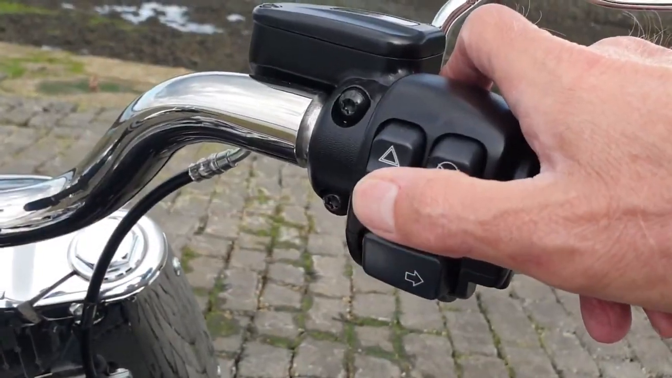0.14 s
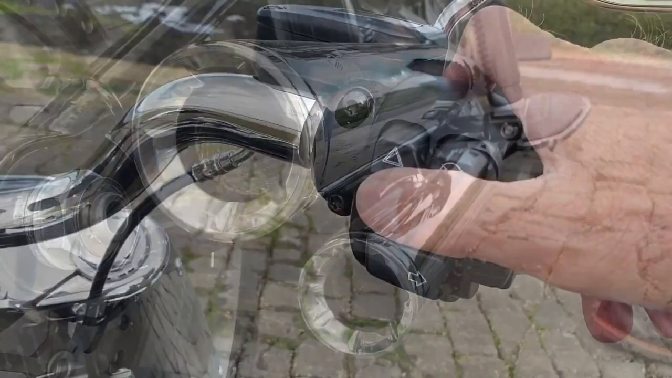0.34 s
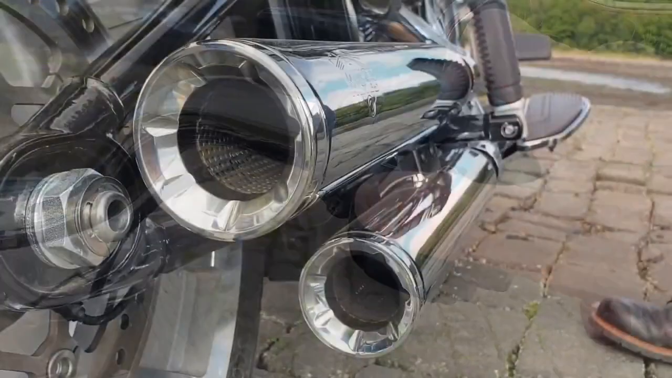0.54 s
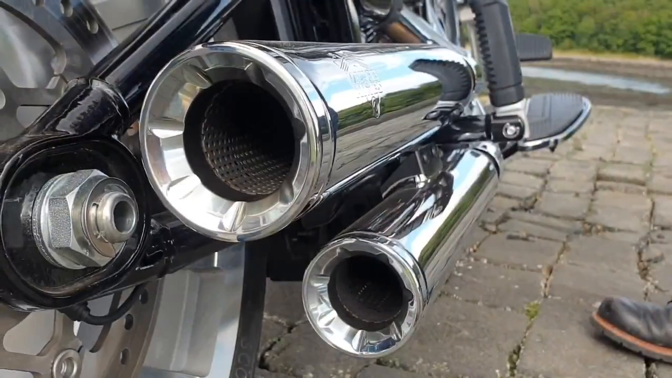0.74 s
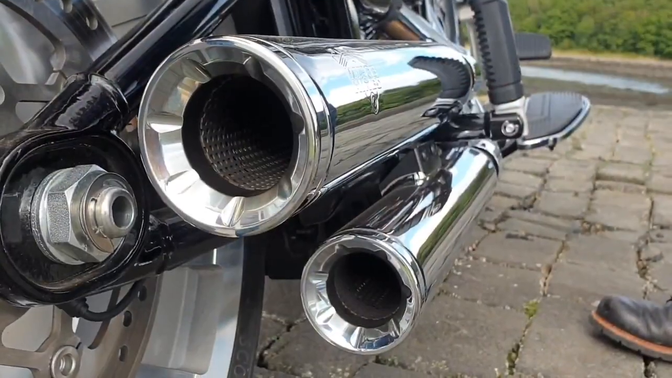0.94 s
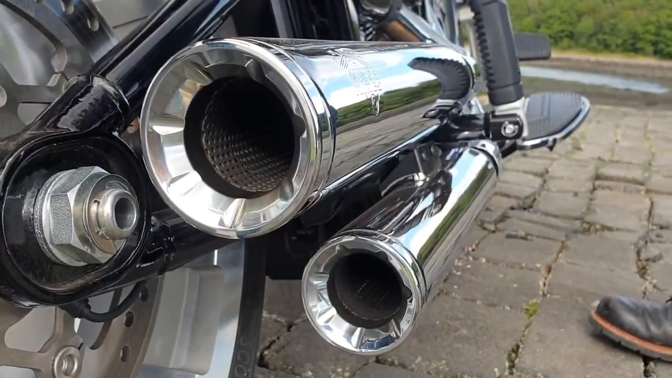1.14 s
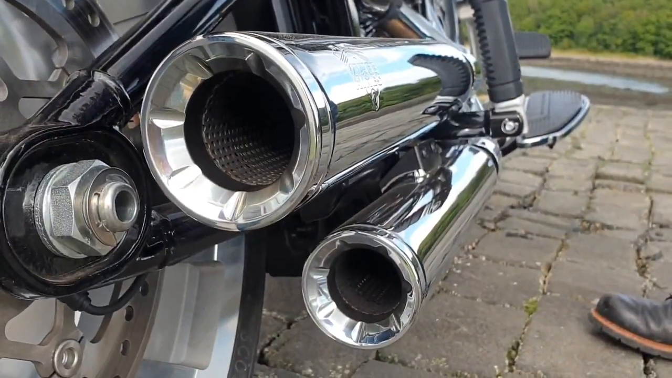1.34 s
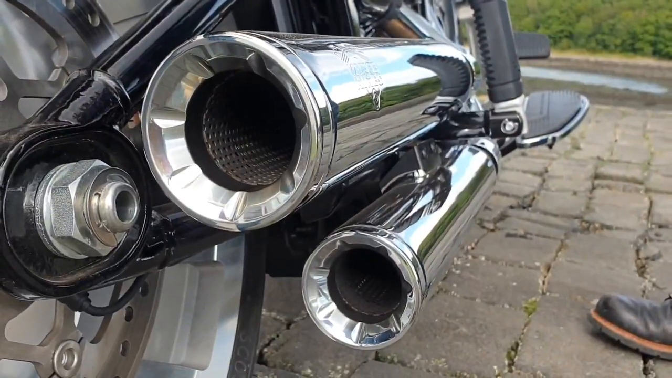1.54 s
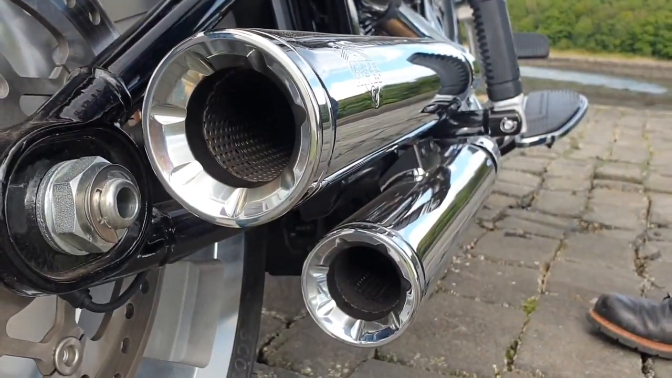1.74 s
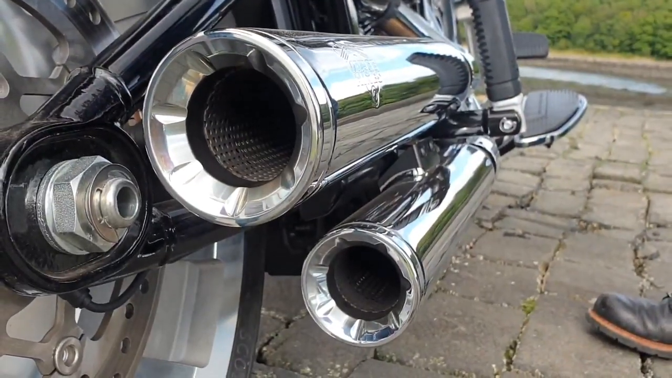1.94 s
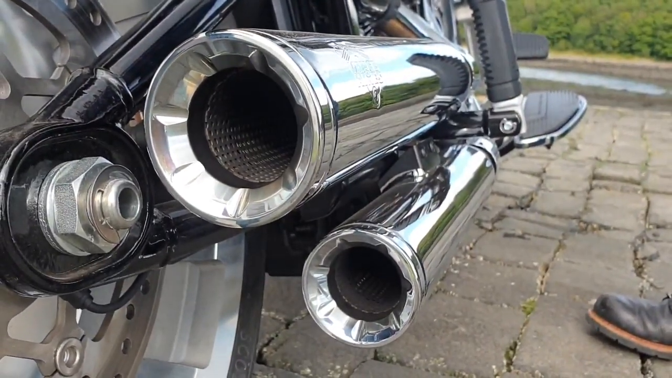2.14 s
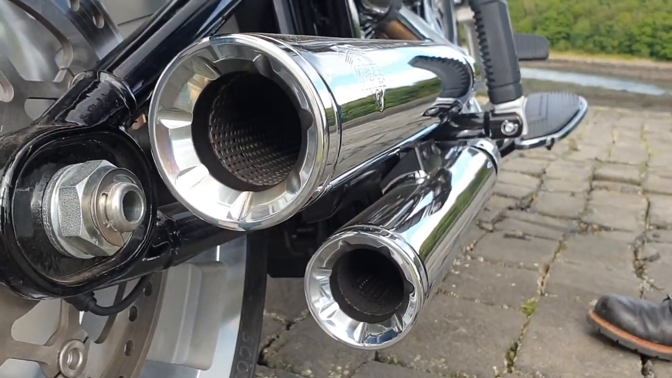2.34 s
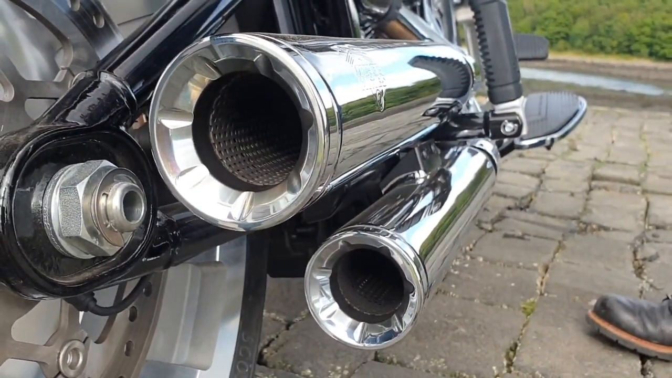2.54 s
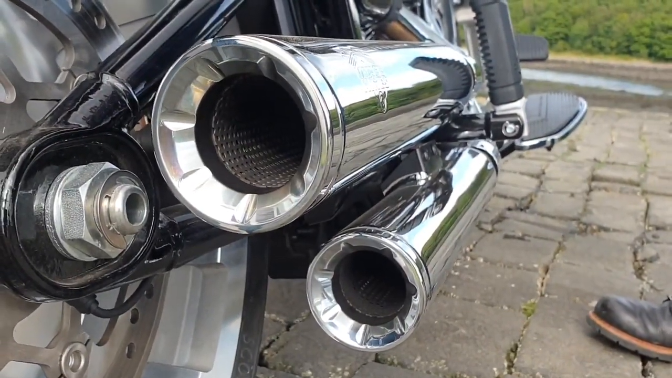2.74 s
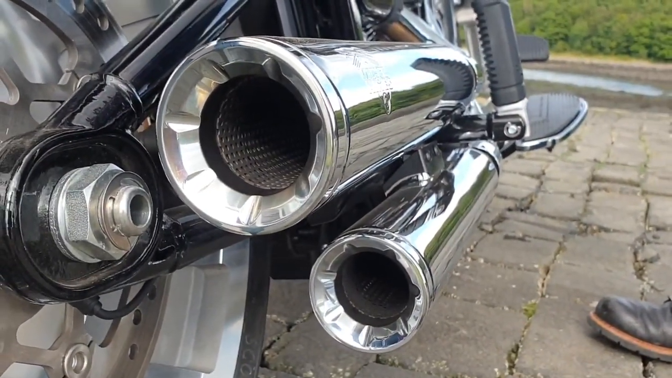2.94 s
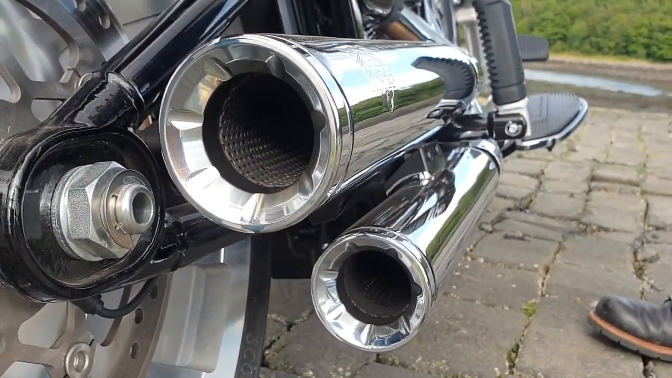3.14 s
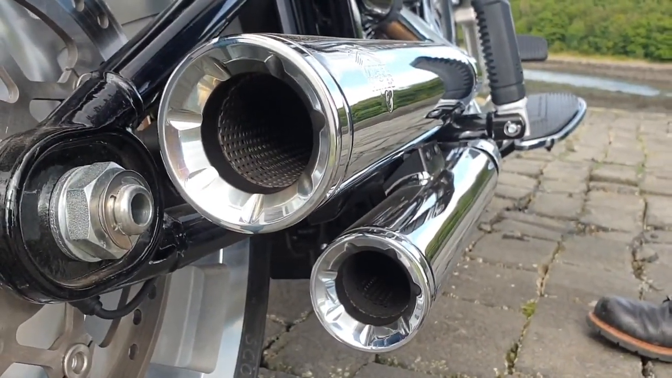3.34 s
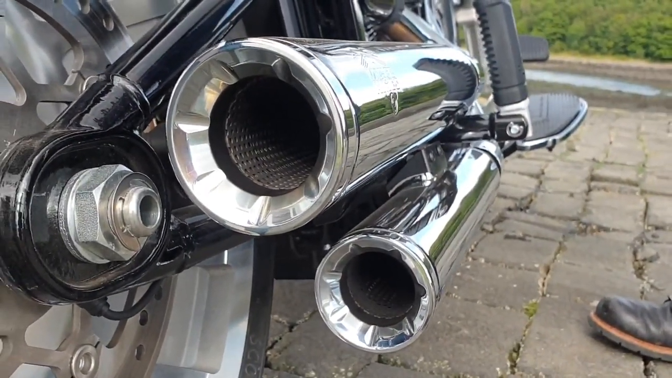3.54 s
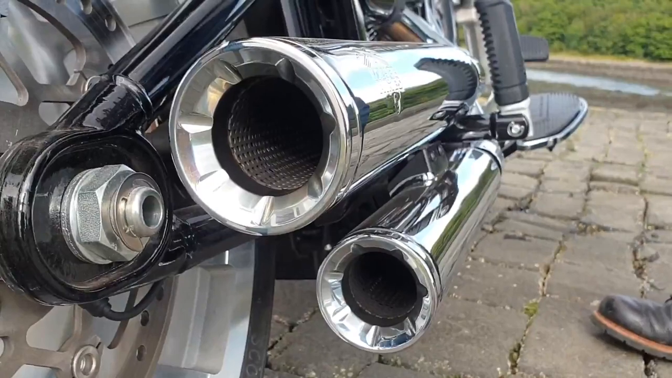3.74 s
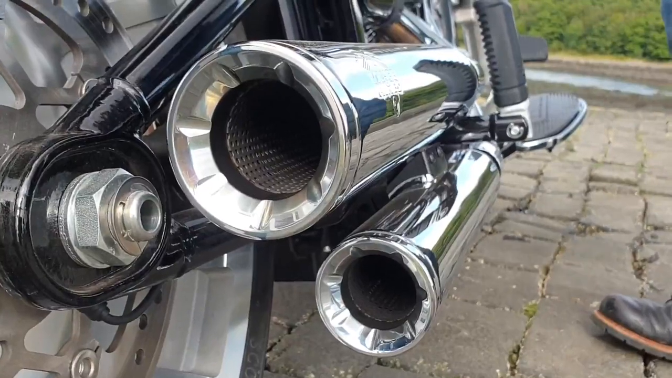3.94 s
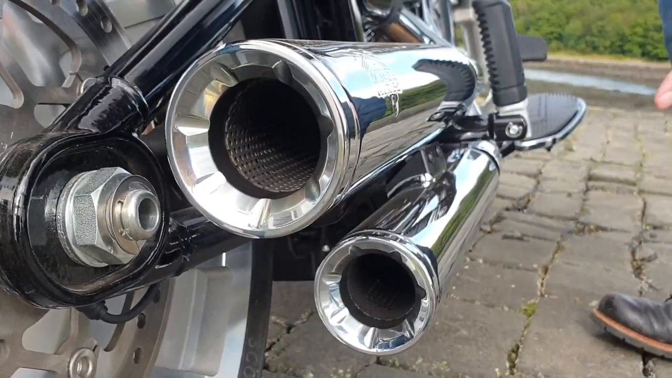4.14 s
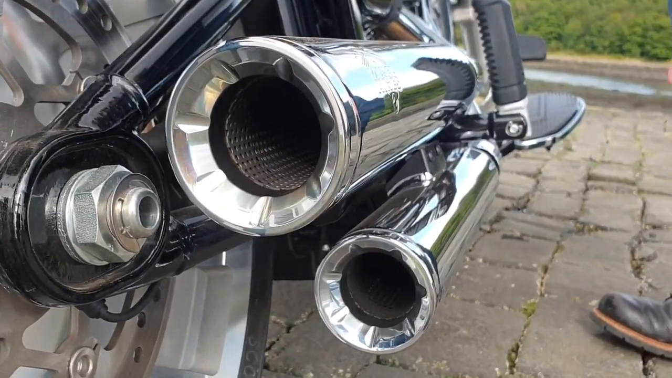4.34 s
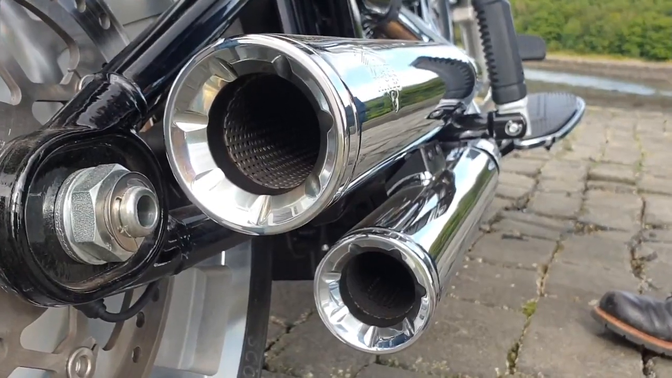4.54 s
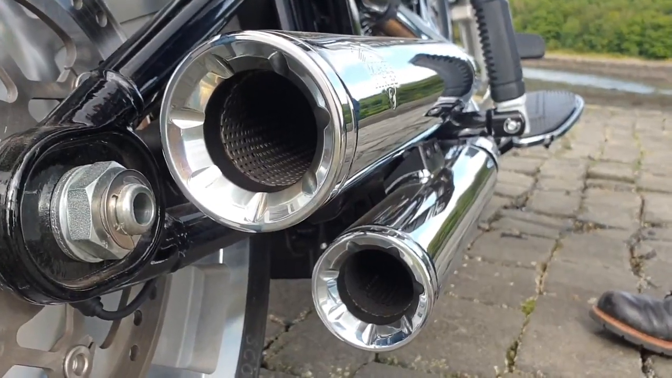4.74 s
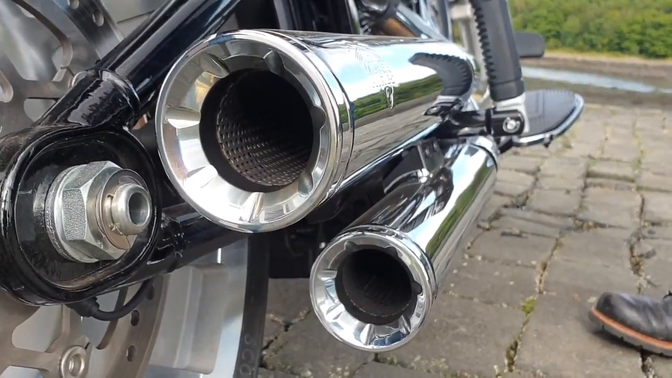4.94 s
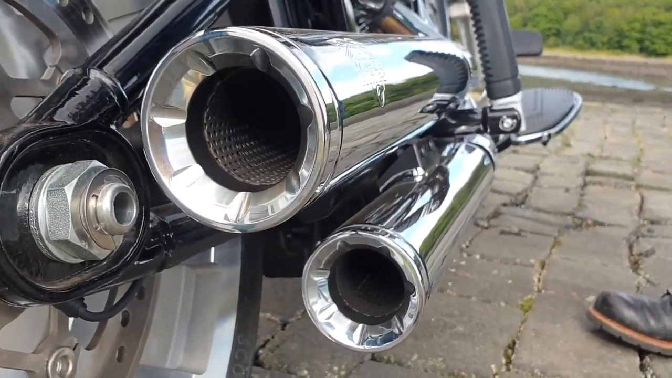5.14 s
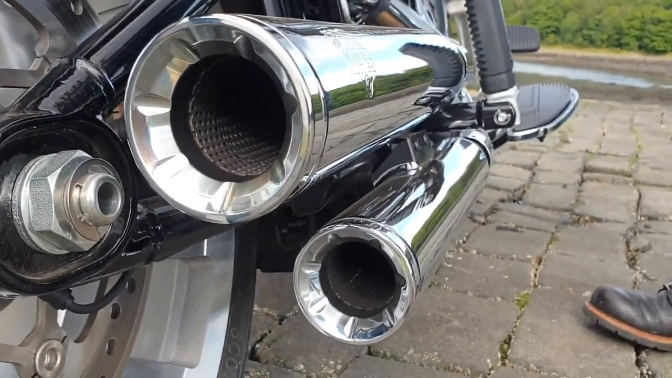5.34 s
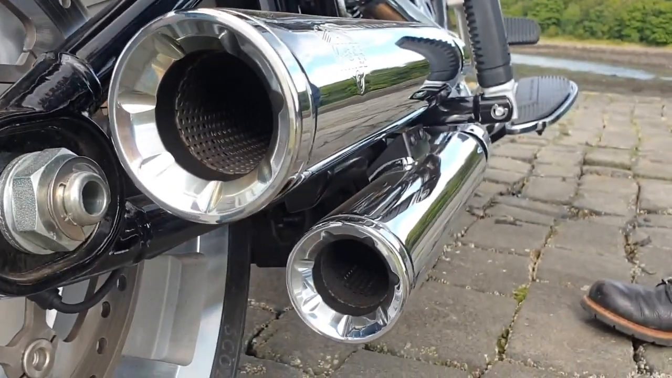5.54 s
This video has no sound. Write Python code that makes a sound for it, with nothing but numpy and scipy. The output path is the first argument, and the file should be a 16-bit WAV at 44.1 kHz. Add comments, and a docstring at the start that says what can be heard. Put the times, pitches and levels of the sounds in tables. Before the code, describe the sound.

Close behind the exhaust, a large motorcycle cranks with hissing chuffs and booming pops, fires up and drops to a low idle.

```python
"""Starting a V-twin motorcycle

A big engine is heard outdoors, close behind its two open mufflers. Wind thumps the microphone, the
fuel pump whines, and the starter engages and pumps hissing air through the engine. The cold pipes pop;
the engine catches, races, stumbles and idles. Its voice is that of resonators driven by impulses:
each gas pulse excites the modes of a pipe and its muffler. Far traffic hums underneath."""
import sys
import numpy as np
from scipy import signal
from scipy.fft import rfft, irfft, next_fast_len
from scipy.io import wavfile
from scipy.ndimage import map_coordinates

SR = 44100
rng = np.random.default_rng(int(sys.argv[2]) if len(sys.argv) > 2 else 0)


def store_pcm(level_fs):
    """Save levels as 16-bit WAV."""
    pcm = np.round(np.clip(level_fs, -1, 1) * 32767).astype(np.int16)
    wavfile.write(sys.argv[1], SR, np.atleast_2d(pcm).T)


N = 246386
FFT_SIZE = next_fast_len(N + SR)
HZ = np.fft.rfftfreq(FFT_SIZE, 1 / SR)
TIME = np.arange(N) / SR

CATCH_S, IDLE_CYCLE_S = 1.4382, .113  # first even opening of the rear exhaust valve; one cycle at idle
FRONT_LEAD_CYCLES = .4375  # the front cylinder runs 315 of 720 degrees ahead
RASP_SCATTER_DB, MISFIRE_SCATTER_DB = 1.67, 3  # firing to firing; added for an empty cylinder
WHISTLE_HZ, SAG_HZ, SAG_S = 10160, 652, 0.029  # starter motor: free pitch, drop under load, its width
BAND_LIMIT_HZ = 15800

# All table levels are relative. Crank speed: (time [s], speed [rpm])
CRANK_SPEED = [(1.44, 2206), (1.5, 1435), (1.58, 1723), (2.16, 1776), (2.2, 1660), (2.41, 1699),
               (2.45, 1905), (2.53, 1065), (2.58, 1375), (2.66, 1595), (2.75, 945), (2.9, 1405),
               (3.06, 950), (3.1, 1106), (3.45, 1055), (5.65, 1070)]
# Running engine: (time [s], pulse [dB], cylinder charge [0-1], front rasp [dB], rear rasp [dB])
ENGINE_LOAD = [(1.44, 15, .9, -39.5, -47.5), (1.511, 17, 0.12, -44, -51), (1.601, 21.7, 0.39, -27, -34.5),
               (1.72, 20, 0.46, -38, -36), (2.06, 18.35, 0.67, -48, -35), (2.27, 16.4, 0.6, -44.5, -43.5),
               (2.35, 13, 0.16, -42.5, -44), (2.48, 14, 0.24, -50, -43), (2.66, 12.2, 1, -47, -46),
               (2.95, 13.5, 0.71, -57.5, -57), (3.099, 11.8, .9, -47, -55.5), (3.6, 13.2, 1.0, -45, -47),
               (4.072, 13.5, 1.0, -43.5, -47.5), (4.411, 16.4, 1.0, -43.5, -40.5),
               (4.749, 20.4, 1.0, -36, -42.5), (5.65, 20.44, 1.0, -38.5, -40)]
# Exhaust valves: (opening [cycles], its pulse corner [Hz], closing [cycles], its pulse corner [Hz],
# closing level [dB], gas front [cycles])
FRONT_VALVE = (-.065, 132, .219, 25.3, 21.7, -.059)
REAR_VALVE = (-.063, 36.2, .226, 766, -2.9, -.023)
# Modes of the exhaust pipes, muffler cans and muffler cores: (frequency [Hz], bandwidth [Hz], level [dB])
FRONT_PIPE_MODES = [(50.2, 3.1, 22.7), (64.3, 7.9, 27.2), (85.9, 19, 25.9), (115, 27, 22.5),
                    (128, 13.7, 21.5)]
REAR_PIPE_MODES = [(60.8, 6.6, 34.4), (80, 19, 25.8), (160, 24.6, 11), (187, 9.3, 15)]
FRONT_CAN_MODES = [(135.5, 21, .7), (169, 27, 6.4)]
REAR_CAN_MODES = [(150, 27, -1.5), (225, 43, -4)]
FRONT_BAFFLE_MODES = [(284, 19, 6.5), (413, 60, 3), (587, 50, 0), (790, 110, -3), (1060, 91, -6)]
REAR_BAFFLE_MODES = [(282.7, 10, -19.5), (390, 67, 0.5), (590, 120, -6.5), (751, 54, 3), (1140, 290, -10)]
# Other resonators: (frequency [Hz], bandwidth [Hz], level [dB])
ENGINE_CASE_MODES = [(601, 46, 7.5), (1453, 44, 0), (1931, 39, 3), (3110, 37, -16), (3560, 180, -26.5),
                     (7620, 130, -28.5)]
STARTER_HOUSING_MODES = [(523, 91, 6), (887, 10, 8.5), (1020, 21, -8.5), (1188, 18, 2.5), (1766, 46, 0),
                         (1980, 16, -9.5), (3050, 27, -9), (3580, 36, -11.5), (5140, 35, -13)]
BOOM_MODES = [(59.4, 4, 30), (73, 9, 25), (103.4, 12, 25.5)]  # cold pipe, long ringing
BARK_MODES = [(133, 12, 3.5), (157.4, 17, 14.5), (190, 24, 2), (308, 51, -3), (338, 54, -12.5),
              (500, 44, -7), (635, 100, -6)]  # cold pipe, short ringing
# Pops before the engine runs evenly: (time [s], boom [dB], bark [dB], spit [dB])
COLD_POPS = [(0.598, 19.5, 24, -33), (0.734, 14, 5, -46.5), (0.79, 15.5, -4, -39), (0.852, 27.5, 34, -18),
             (.932, 22.5, 17, -37), (0.999, 22.5, 14, -45.5), (1.01, 10, 9, -22),
             (1.065, 31.5, 28.5, -28.5), (1.191, 11.5, 12, -25), (1.226, 25, 33, -21),
             (1.262, 30, 34.5, -14), (1.343, 31, 27.5, -13), (1.388, 28, 25.5, -30),
             (1.442, 20.5, 17.5, -29.5), (1.523, 9.5, 15.5, -33), (1.598, 2.5, 13, -30.5)]
# Starter load at and between compressions: (time [s], chuff [dB], gear grind [dB], air hiss [dB])
COMPRESSION_PEAKS = [(0.65, -15.5, -28, -24), (0.847, -19.5, -29.5, -28), (1.065, -19.5, -31.5, -32),
                     (1.229, -28.5, -33, -32.5), (1.351, -26.5, -41, -47)]
CRANKING_FLOOR = [(.405, -52.5, -67.5, -76), (.423, -47.5, -25, -42), (.477, -29, -39.5, -50),
                  (.563, -51, -41, -55.5), (.72, -58, -41.5, -49.5), (.79, -45.5, -40, -51),
                  (.99, -40.5, -47.5, -54), (1.17, -49, -49.5, -54), (1.32, -45, -52.5, -63.5),
                  (1.39, -35.5, -55, -66.5), (1.5, -57, -51.5, -65.5)]
# Slopes of each compression peak: (chuff [dB/s], gear grind [dB/s], air hiss [dB/s])
PEAK_RISE = [314.5, 148, 332]
PEAK_FALL = [290, 326.5, 478]
# The gears take the load ahead of each peak: (time [s])
PEAK_ONSETS = [.5, .735, 1.008, 1.19, 1.328]
# Starter clicks and one short puff of hissing air: (time [s], level [dB], low part offset [dB], t60 [s])
CLICKS_AND_PUFF = [(0.4224, -13.5, -24.5, 0.017), (0.4419, -15, 2, 0.031), (1.141, -23, -13, 0.015),
                   (1.3483, -31.5, 8.5, 0.022)]
# Wind on the microphone ports: (time [s], level [dB])
WIND_GUSTS = [(0.048, -35), (0.155, -32), (.245, -34), (0.336, -32.5), (.44, -30), (.52, -33.5),
              (0.599, -21), (.66, -25), (.75, -29)]
# Fuel pump whine: (time [s], frequency [Hz], level [dB])
PUMP_WHINE = [(.23, 1680, -90), (.26, 1743, -80), (.31, 1836, -84), (.36, 1687, -74), (.41, 1710, -86),
              (.45, 1720, -97)]
# Noise spectra: (frequency [Hz], spectral level [dB])
CLATTER_SPECTRUM = [(150, -27), (250, -0.5), (500, -5.5), (604, -11), (1250, -24.5), (1960, -22),
                    (2540, -29.5), (5080, -37.5), (8540, -44.5), (12900, -46), (15700, -55)]  # valve gear and chains
CHUFF_SPECTRUM = [(120, -43.5), (200, -17), (302, 5.5), (367, -14.5), (532, -4), (619, -19), (673, -16.5),
                  (928, -13.5), (1020, -12.5), (1360, -35.5), (1500, -34.5), (1950, -44.5), (3300, -120)]  # pumped air
GRIND_SPECTRUM = [(650, -39.5), (1100, -17.5), (1190, 0.5), (1600, -4), (2100, -2), (2860, -15.5),
                  (3160, -16), (4330, -17), (5240, -19), (6720, -26.5), (8000, -26.5), (10400, -63.5),
                  (17600, -120)]  # loaded gears
HISS_SPECTRUM = [(3820, -45), (6500, -21), (7670, -9.5), (8500, -20), (9460, -9), (11400, -10.5),
                 (12600, 0.5), (13200, -1.5), (15700, -3.5)]  # escaping air
STEEL_SPECTRUM = [(710, -30.5), (1200, 4.5), (1500, -15), (1710, -0.5), (3330, -8), (3630, -9),
                  (5180, -8.5), (13800, -30), (15700, -13)]  # bright, metallic
WIND_SPECTRUM = [(15, -52), (25, -7.5), (92, -1), (242, -13), (277, -17), (500, -29), (650, -61),
                 (1100, -120)]
TRAFFIC_SPECTRUM = [(180, -41), (300, -19.5), (317, -4), (355, -16), (560, -21.5), (828, -17), (1600, -41),
                    (2080, -83), (3520, -120)]
# Likeness of noise at the two ports: (frequency [Hz], correlation [0-1])
PORT_CORRELATION = [(60, 0.94), (180, 0.53), (550, 0.82), (1650, 0.22), (4970, 0.05), (15000, 0.12)]
# The left port hears less treble: (frequency [Hz], left minus right [dB])
PORT_TILT = [(60, 2.6), (130, 2.9), (290, 4.0), (640, 1.8), (1410, -4.5), (3100, -10), (6820, -17.5),
             (15000, -15)]


def engine():
    """Superposition: two unevenly spaced exhaust pulse trains add to valve clatter and gas jets."""
    times, db, charge, front_rasp_db, rear_rasp_db = engine_cycles()
    front, front_flow, front_ticks = cylinder(
        times, db, charge, front_rasp_db, FRONT_VALVE, FRONT_PIPE_MODES, FRONT_CAN_MODES,
        FRONT_BAFFLE_MODES, lead=FRONT_LEAD_CYCLES, pipe_gain=-0.91)
    rear, rear_flow, rear_ticks = cylinder(
        times, db, charge, rear_rasp_db, REAR_VALVE, REAR_PIPE_MODES, REAR_CAN_MODES,
        REAR_BAFFLE_MODES, lead=0, pipe_gain=0.82)
    pipes = front * amp([[-1.4], [1.4]]) + rear * amp([[1.4], [-1.4]])  # front right, rear left
    return pipes + valve_gear(front_ticks + rear_ticks) + gas_jets(front_flow + rear_flow)


def engine_cycles():
    """Four-stroke cycle: the rear exhaust opens every second turn. Gives those times and their load."""
    clock = CATCH_S + TIME
    rpm = np.interp(clock, *np.transpose(CRANK_SPEED))
    cycles = np.cumsum(rpm) / 120 / SR
    times = np.interp(np.arange(cycles[-1] // 1), cycles, clock)
    times = times[times < N / SR + IDLE_CYCLE_S]
    knots, *columns = np.transpose(ENGINE_LOAD)
    return [times] + [np.interp(times, knots, column) for column in columns]


def cylinder(times, db, charge, rasp_db, valve, pipe, can, baffle, lead, pipe_gain):
    """Impulse excitation: blowdown and suction ring the pipe; the gas front rings can and baffle."""
    def at(phase):
        count = np.arange(len(times))
        return np.interp(count + phase - lead, count, times)

    opens, open_hz, shuts, shut_hz, shut_db, gas_front = valve
    scatter = rng.standard_normal((len(times), 8)).T
    charge = np.clip(charge + (1 - charge) * scatter[6], 0, 1)  # only a part-filled cylinder varies
    rasp_db = rasp_db + (RASP_SCATTER_DB + MISFIRE_SCATTER_DB * (1 - charge)) * scatter[7]
    blowdown = filtered(impulses(at(opens), amp(db + .5 * scatter[0]) * charge), rounded(open_hz))
    suction = filtered(impulses(at(shuts), amp(db + .5 * scatter[1] + shut_db)), rounded(shut_hz))
    steepness = (IDLE_CYCLE_S / np.gradient(times)) ** 1.07  # the gas front steepens with speed
    knock = filtered(impulses(at(gas_front), amp(db + 5 + scatter[3]) * steepness), modes(can))
    boom = pipe_gain * filtered(blowdown - suction, modes(pipe))
    bass = filtered(boom - knock, 1 / (1 + (HZ / 300) ** 8))
    crack = filtered(impulses(at(-0.0313), amp(rasp_db + 45.5)), modes(baffle) * rounded(897))
    flow = bursts(at(-0.043), amp(rasp_db), t60=0.053, rise_s=0.0014)
    flow += bursts(at(0.17), amp(db - 71.5 + 3.2 * scatter[2]), t60=0.048, rise_s=0.0096)
    turbulence = noise([(200, -25.5), (350, -2), (1200, 1), (3000, -12.5), (15000, -26)])
    rasp = flow * unit_rms(filtered(turbulence, modes(baffle)))
    valve_lift = bursts(at(0.014), amp(db + 4.5 * scatter[4]), t60=0.11)
    valve_seat = bursts(at(0.22), amp(db + 4.5 * scatter[5]), t60=0.11)
    return bass + crack + rasp, flow, valve_lift + valve_seat  # sound, jet envelope, tick envelope


def valve_gear(ticks):
    """Structure-borne sound: valves and chains clatter and excite the modes of the engine cases."""
    pulse_db = curves(ENGINE_LOAD)[0]
    envelope = amp(pulse_db + 0.96 * wobble(60)) + 0.92 * ticks
    shaking = noise([(300, -9.5), (600, 8), (2000, -1.5), (3000, -9.5), (15000, -9.5)])
    ring = unit_rms(filtered(shaking, modes(ENGINE_CASE_MODES)))
    clatter = amp(-69) * noise(CLATTER_SPECTRUM)
    return envelope * (clatter + amp(-75.5) * ring + amp(-95.5) * noise(HISS_SPECTRUM))


def gas_jets(flow):
    """Turbulent jet noise: a thin stream of gas hisses at each valve opening."""
    return flow * (amp(-21) * noise(HISS_SPECTRUM) + amp(-13) * noise(GRIND_SPECTRUM))


def cold_pops():
    """Free vibration: single pulses, rarefaction first, ring the cold pipes and spit a little gas."""
    times, boom_db, bark_db, spit_db = np.transpose(COLD_POPS)
    boom = filtered(impulses(times, amp(boom_db)), modes(BOOM_MODES) * rounded(87))
    in_phase = sum(modes([mode]) for mode in BARK_MODES)
    bark = filtered(impulses(times, -amp(bark_db)), in_phase * rounded(500))
    gas = noise([(200, -4), (400, 6), (1000, 3), (2200, -10), (5000, -34), (15000, -35.5)])
    return boom + bark + bursts(times, amp(spit_db), t60=0.059, rise_s=0.0021) * gas


def starter():
    """Amplitude modulation by load: each compression strains the gears and blows air out."""
    times, *levels = np.transpose(COMPRESSION_PEAKS)
    peaks = [swells(times, db, rise, fall, PEAK_ONSETS)
             for db, rise, fall in zip(levels, PEAK_RISE, PEAK_FALL)]
    chuff_level, grind_level, hiss_level = amp(curves(CRANKING_FLOOR)) + peaks
    meshing = noise([(300, -23.5), (600, 3.5), (15000, 0.5)])
    housing = unit_rms(filtered(meshing, modes(STARTER_HOUSING_MODES)))
    chuff = chuff_level * amp(4.7 * wobble(60)) * noise(CHUFF_SPECTRUM)
    grind = grind_level * amp(1.2 * wobble(80)) * (noise(GRIND_SPECTRUM) + 1.02 * housing)
    hiss = hiss_level * amp(0.69 * wobble(60)) * noise(HISS_SPECTRUM)
    return chuff + grind + hiss + hiss_level * motor_whistle(times)


def motor_whistle(compression_times):
    """Pitch follows rotation rate: the starter motor's whistle sags under each compression."""
    load = np.exp(-((TIME - compression_times[:, None]) / SAG_S) ** 2).sum(0)
    return amp(-17.5 + 2.8 * wobble(150)) * sine(WHISTLE_HZ - SAG_HZ * load + 120 * wobble(300))


def clicks_and_puff():
    """Damped transients: starter clicks and one short puff of hissing air; the lows ring longer."""
    bright = noise(STEEL_SPECTRUM) + amp(-7) * noise(HISS_SPECTRUM)
    low = noise(CHUFF_SPECTRUM)
    sound = np.zeros((2, N))
    for time, db, low_db, t60 in CLICKS_AND_PUFF:
        sound += bursts([time], [amp(db - 2.5)], t60) * bright
        sound += bursts([time], [amp(db + low_db)], 2 * t60) * low
    return sound


def wind():
    """Turbulent pressure: gusts thump each microphone port differently."""
    times, db = np.transpose(WIND_GUSTS)
    gusts = swells(times, db, rise_db_per_s=365, fall_db_per_s=365)
    eddies = amp(1.6 * np.array([wobble(30), wobble(30)]))
    return gusts * unit_rms(eddies * noise(WIND_SPECTRUM, correlation=0.46))


def fuel_pump():
    """Frequency modulation: the pump's faint whine wavers in pitch."""
    hz, db = curves(PUMP_WHINE)
    return amp(db) * sine(hz + 15 * wobble(40))


def far_traffic():
    """A diffuse field: distant traffic hums, nearly uncorrelated between the ports."""
    return amp(-58 + 1.1 * wobble(5.2)) * noise(TRAFFIC_SPECTRUM, correlation=0.12)


def amp(db):
    """Decibels as an amplitude ratio."""
    return 10 ** (np.asarray(db) / 20)


def unit_rms(x):
    """Normalisation to a mean power of 1."""
    return x / np.sqrt(np.mean(x ** 2) + 1e-20)


def sine(hz):
    """A tone whose phase is the integral of its frequency."""
    return np.sin(2 * np.pi * np.cumsum(hz) / SR)


def over_frequency(points):
    """Interpolation of (frequency [Hz], value) points on a logarithmic axis."""
    hz, values = np.transpose(points)
    return np.interp(np.log(HZ + 1), np.log(hz + 1), values)


def curves(rows):
    """Interpolation in time of each later column; -120 outside the table."""
    times, *columns = np.transpose(rows)
    return [np.interp(TIME, times, column, -120, -120) for column in columns]


def wobble(rate):
    """Smooth random fluctuation, with rate knots a second."""
    return map_coordinates(rng.standard_normal(int(N * rate / SR) + 4), [np.arange(N) * rate / SR])


def filtered(x, response):
    """Convolution as a product of spectra."""
    return irfft(rfft(x, FFT_SIZE) * response, FFT_SIZE)[..., :N]


def modes(table):
    """Modal sum: the causal response of resonances, neighbours in opposite phase."""
    return sum((-1) ** k * amp(db) * 1j * HZ * width / (centre ** 2 - HZ ** 2 + 1j * HZ * width)
               for k, (centre, width, db) in enumerate(table))


def rounded(corner_hz):
    """Critical damping: a low-pass response that rounds the rise and fall of a gas pulse."""
    return 1 / (1 + 1j * HZ / corner_hz) ** 2


def impulses(times, sizes):
    """An impulse train, one sample at each time."""
    samples = np.round(np.asarray(times) * SR).astype(int)
    return np.bincount(samples, sizes, FFT_SIZE)[:N]


def bursts(times, sizes, t60, rise_s=0.00049):
    """Exponential decay: an envelope that jumps at each time and falls 60 dB in t60 seconds."""
    age = np.arange(SR // 4) / SR
    shape = amp(-60 * age / t60) * (1 - np.exp(-age / rise_s))
    return np.abs(signal.fftconvolve(impulses(times, sizes), shape)[:N])


def swells(times, db, rise_db_per_s, fall_db_per_s, onsets=0):
    """Exponential growth and decay: an envelope with a peak at each time, silent before its onset."""
    lag = TIME - times[:, None]
    begun = TIME >= np.reshape(onsets, (-1, 1))
    return (begun * amp(db[:, None] + np.minimum(rise_db_per_s * lag, -fall_db_per_s * lag))).sum(0)


def noise(spectrum, correlation=None):
    """Partial coherence: stereo noise of rms 1 whose channels by default agree less in the treble."""
    if correlation is None:
        correlation = over_frequency(PORT_CORRELATION)
    angle = np.arccos(correlation) / 2 * np.ones_like(HZ)
    response = amp(over_frequency(spectrum)) * [np.cos(angle), np.sin(angle)]
    mid, side = filtered(rng.standard_normal((2, N)), response)
    return unit_rms(np.array([mid + side, mid - side]))


def scene():
    """Superposition: the pressures of the motorcycle and its surroundings add."""
    return engine() + cold_pops() + starter() + clicks_and_puff() + fuel_pump() + wind() + far_traffic()


def record(dry):
    """Transduction: two unequal microphone ports, soft saturation near full scale and a band limit."""
    ports = filtered(dry, amp(over_frequency(PORT_TILT) / 2 * [[1], [-1]]))
    saturated = ports / (1 + np.abs(ports / .99) ** 8) ** (1 / 8)
    return filtered(saturated, HZ < BAND_LIMIT_HZ)


dry = scene()
out = record(dry)
store_pcm(out)
```